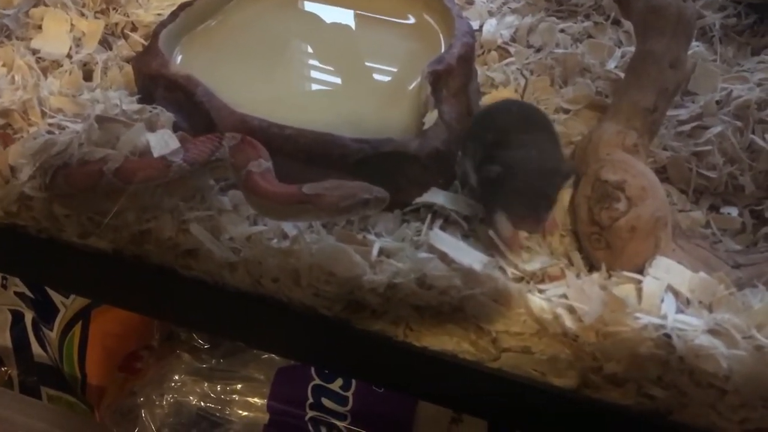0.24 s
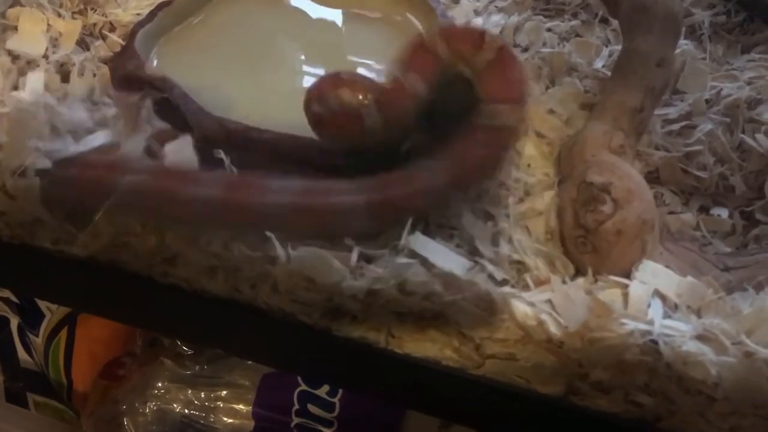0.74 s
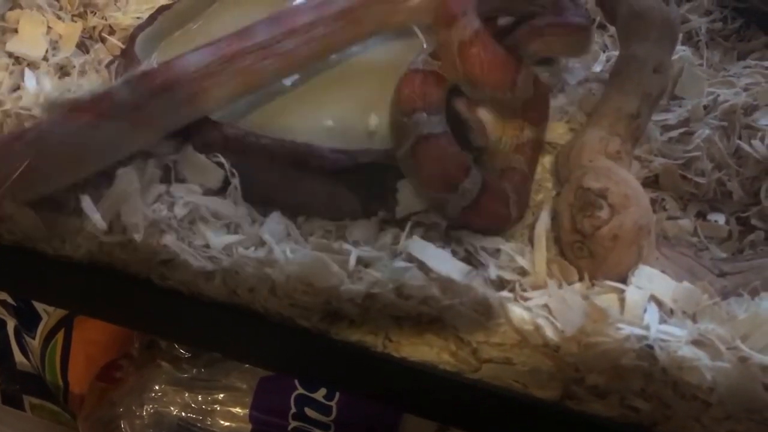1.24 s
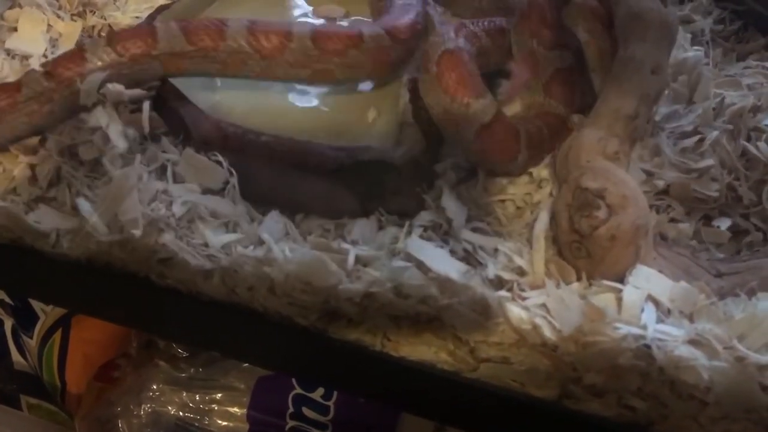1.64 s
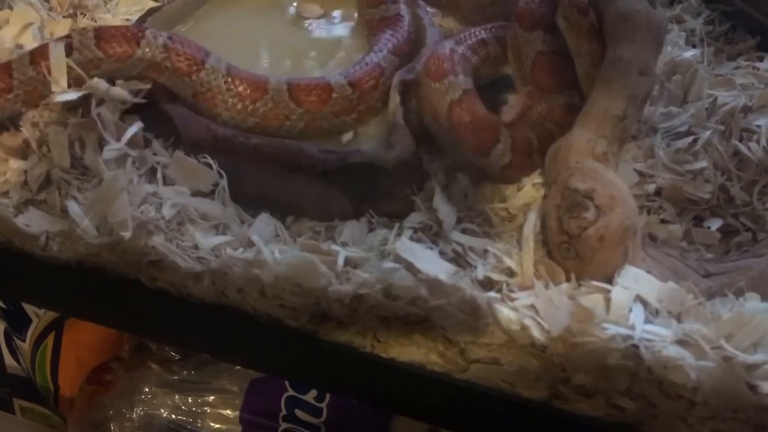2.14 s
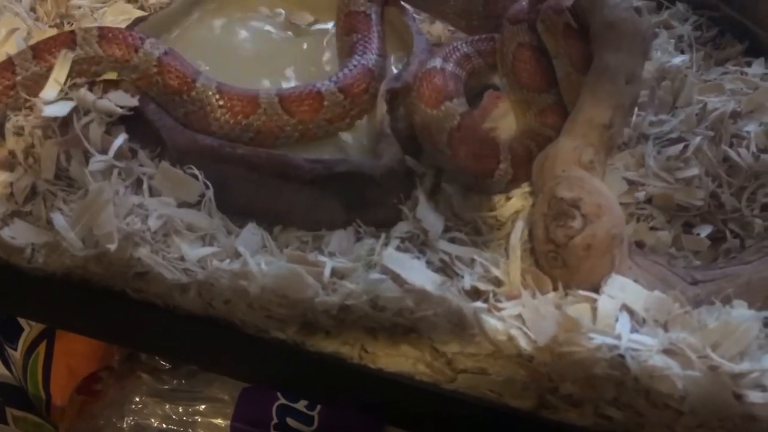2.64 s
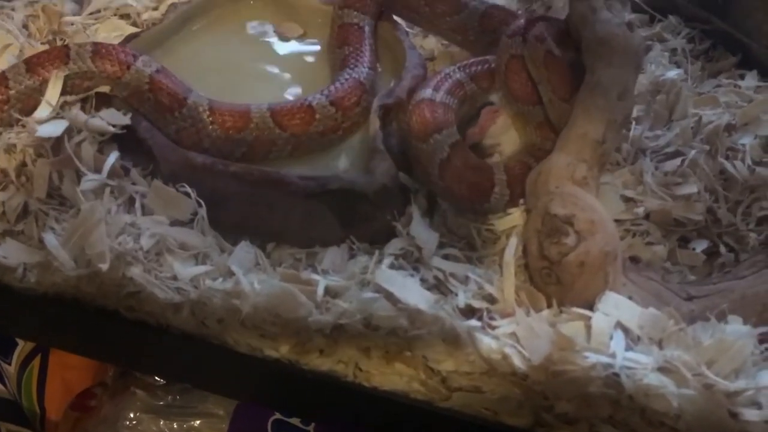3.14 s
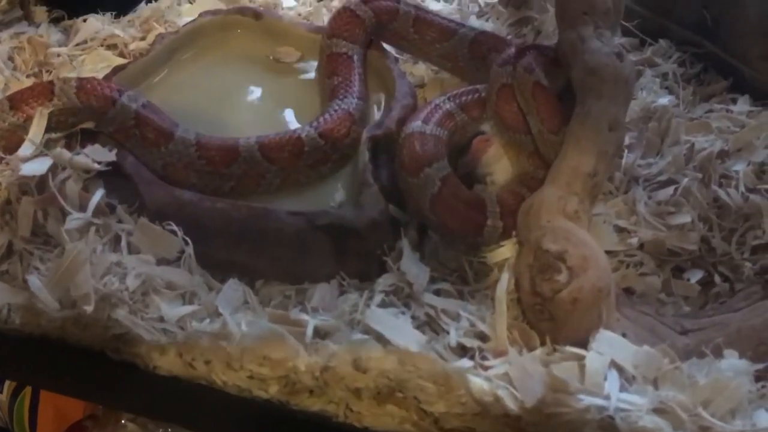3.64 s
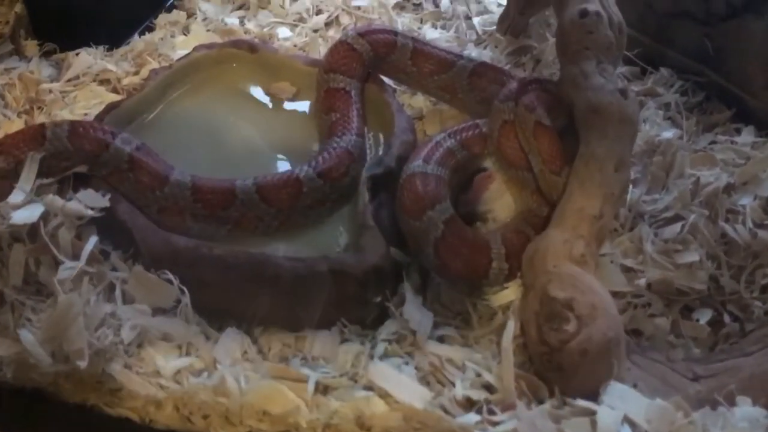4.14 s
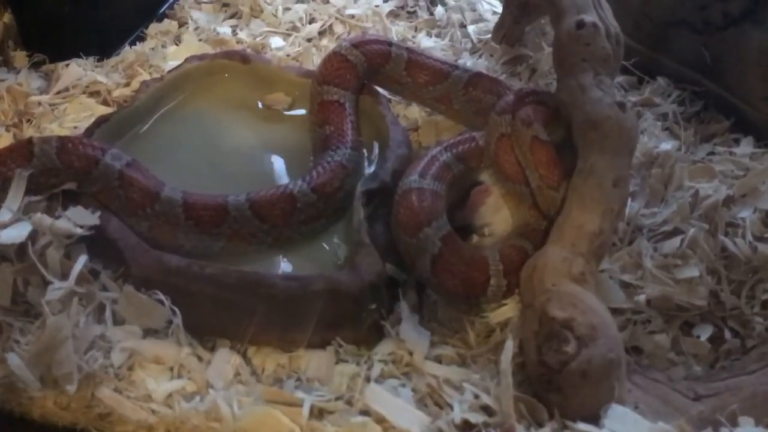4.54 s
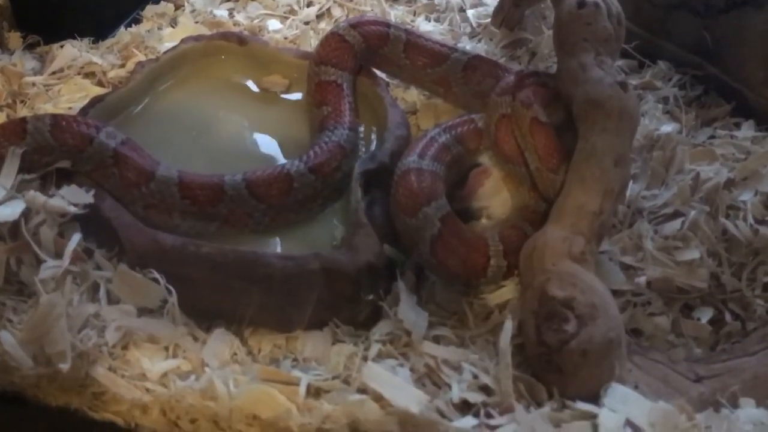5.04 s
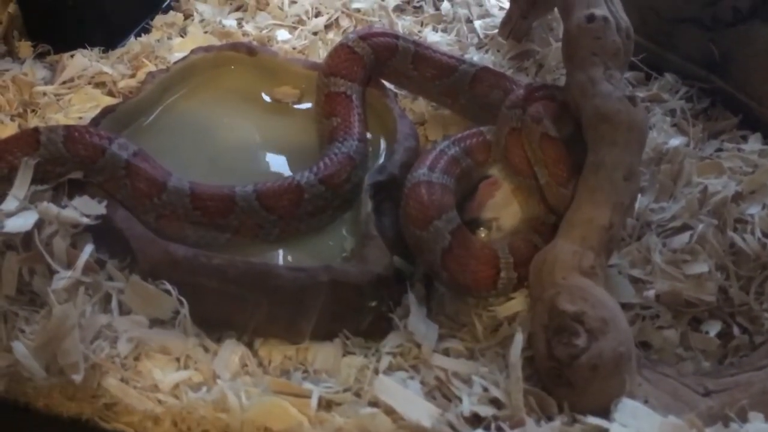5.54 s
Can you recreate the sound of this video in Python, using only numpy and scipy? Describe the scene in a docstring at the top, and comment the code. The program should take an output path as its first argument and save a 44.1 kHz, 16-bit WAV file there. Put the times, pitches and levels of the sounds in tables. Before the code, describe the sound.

In a small glass tank bedded with wood shavings, a snake lunges and strikes with a sharp hollow knock. A mouse squeals in short, raspy high chirps, the last one loudest, then wheezes weakly. Shavings rustle. Afterwards there is only low handling rumble, faint hiss and dull thumps from a close hand-held microphone.

```python
"""A mouse squeals in quick, strained arches as a snake strikes it in a glass tank bedded with wood shavings.
Its stack of harmonics breaks into a second pitch; an undertone and two wheezes trail the last squeal.
The snake's knocks ring damped modes, its moves stir grains of bedding, and decaying noise gives the tank's echo.
A hand-held camera close by adds dispersed handling thumps, filtered-noise rumble, hiss and a soft motor whirr."""
import sys
import numpy as np
from scipy import signal
from scipy.fft import rfft, irfft
from scipy.io import wavfile

SR = 44100
rng = np.random.default_rng(int(sys.argv[2]) if len(sys.argv) > 2 else 0)


def wrap_up_sound(samples):
    """Save the sound to the file named by the first command line argument, as 16-bit audio."""
    columns = np.atleast_2d(samples).T
    # keep every value between -1 and 1, then stretch to whole-number steps
    tamed = np.clip(columns, -1, 1)
    steps = np.round(tamed * 32767).astype(np.int16)
    wavfile.write(sys.argv[1], SR, steps)


N = 255780
TIME = np.arange(N) / SR

# the mouse's throat: (f/Hz, relative level/dB)
THROAT = [(1100, -24), (1700, -15), (2300, 4), (3100, -1.5), (3900, -9.5), (4900, 0), (5700, 1), (6600, 0),
          (7400, 2), (8400, -10.5), (11500, -9), (15500, -18.5)]
# the colour of crunching, stirred shavings: (f/Hz, relative level/dB)
SHAVINGS = [(200, 6), (400, 6), (800, -1.5), (1300, -2.5), (2400, -7.5), (4000, -16.5), (8000, -19),
            (15000, -46)]


def undb(db):
    """Decibels to gain."""
    return 10 ** (np.asarray(db) / 20)


def unit(x):
    """Scale to rms 1."""
    return x / np.sqrt(np.mean(x ** 2))


def shape_db(points, hz):
    """Read a spectrum on a log-frequency axis."""
    f, db = np.transpose(points)
    return np.interp(np.log(np.maximum(hz, 1)), np.log(f), db)


def colour(x, points):
    """Give a signal a spectrum; rms 1."""
    gain = undb(shape_db(points, np.fft.rfftfreq(N, 1 / SR)))
    return unit(irfft(rfft(x) * gain, N))


def wander(hz):
    """Smooth chance, rolling off around a given rate; rms 1."""
    f = np.fft.rfftfreq(N, 1 / SR)
    return unit(irfft(rfft(rng.standard_normal(N)) / (1 + (f / hz) ** 2), N))


def gate(start, end, attack_s, release_s):
    """Attack, hold and release, 0-1."""
    return np.clip(np.minimum((TIME - start) / attack_s, (end - TIME) / release_s), 0, 1)


def add(out, s, sound, peak_db):
    """Place a sound at a time, with a given peak."""
    i = max(int(s * SR), 0)
    out[i:i + len(sound)] += (undb(peak_db) * sound / np.abs(sound).max())[:N - i]


def mouse(jitter=0.0533, jitter_hz=420, waver=0.0269, waver_hz=127, quiver=0.049, quiver_hz=45,
          shimmer_db=0.5, rasp_hz=380, air_db=-19, arch=1.8, flicker_db=2.0,
          mouth_db=7.5, mouth_width_hz=590, attack_s=0.016, release_s=0.015):
    """Strained vocal folds: a quivering, rasping stack of harmonics, joined by a second pitch where it breaks."""
    # squeals, some in two or three quick efforts; pitch climbs with the strain to a crest, then sinks:
    # (start t/s, crest t/s, end t/s, top pitch f/Hz, pitch sag at the ends/0-1, level/dB,
    #  swell toward the crest/dB, brightness/dB per octave, roughness/0-1, mouth resonance f/Hz)
    squeals = [(0.691, 0.714, 0.77, 2182, 0.14, -47, 4, 0.5, 0.4, 5940),
               (0.765, .835, 0.85, 2352, 0.16, -45, 4.5, 2.5, 0.6, 6300),
               (0.849, 0.907, .936, 2319, .08, -35, 12, 2, .55, 6670),
               (1.024, 1.146, 1.247, 2975, .3, -46, 12.5, 3.5, 0.74, 6860),
               (1.196, 1.247, 1.292, 2780, .24, -49.5, 4.5, 3.5, 0.58, 5670),
               (1.407, 1.464, 1.512, 2505, 0.21, -52.5, 10.5, 3.5, .55, 5340),
               (1.612, 1.668, 1.74, 2275, 0.08, -45, 8.5, 4.5, 0.39, 4860),
               (1.691, 1.753, 1.784, 2462, 0.07, -42, -1.5, 0, 0.41, 5000),
               (1.957, 1.994, 2.02, 2120, .05, -47.5, 14, -14.5, 0.4, 4350),
               (1.994, 2.059, 2.153, 2504, 0.23, -32.5, 11.5, -1.5, 0.74, 5166)]
    quiver_rate = quiver_hz * (1 + .25 * wander(20))
    tremor = quiver * np.sin(2 * np.pi * np.cumsum(quiver_rate) / SR)
    shake = tremor + jitter * wander(jitter_hz) + waver * wander(waver_hz)
    rasp = shimmer_db * wander(rasp_hz)
    second, beating = second_pitch()
    air = undb(air_db) * colour(rng.standard_normal(N), THROAT)
    out = np.zeros(N)
    k = np.arange(1, 8)[:, None]  # harmonic numbers
    flicker = flicker_db * np.array([wander(40) for _ in k])  # each harmonic comes and goes
    for start, crest, end, top_hz, sag, db, swell_db, tilt_db, rough, mouth_hz in squeals:
        on = (TIME > start) & (TIME < end)
        slack = np.abs(TIME[on] - crest) / max(crest - start, end - crest)  # 0 at full strain
        hz = top_hz * (1 - sag * slack ** arch) * (1 + rough * shake[on])
        loudness = undb(db - swell_db * slack) * gate(start, end, attack_s, release_s)[on]

        mouth = mouth_db / (1 + ((k * hz - mouth_hz) / mouth_width_hz) ** 2)
        gain_db = shape_db(THROAT, k * hz) + mouth + tilt_db * np.log2(k) + flicker[:, on]
        gain = undb(gain_db) * (k * hz < SR / 2)
        phase = 2j * np.pi * np.cumsum(hz) / SR
        harmonics = gain * np.exp(2j * np.pi * k * np.cumsum(hz) / SR)
        stack = harmonics.sum(0) / np.sqrt((gain ** 2).sum(0))

        # the tiny throat passes the sum tones of the two pitches, mostly those of the fundamental
        sum_tones = beating[on] * np.exp(phase)
        total = np.sqrt(1 + np.abs(second[on]) ** 2 + np.abs(beating[on]) ** 2)
        voice = (stack + second[on] + sum_tones).imag / total
        out[on] += loudness * (unit(voice * undb(rough * rasp[on])) + rough * air[on])
    return out


def second_pitch(jitter=0.055):
    """A second oscillation in each voice break, once at its own level and once at that of its sum tone."""
    # the voice breaks: (start t/s, end t/s, f/Hz, level against the stack/dB, sum tone level/dB)
    breaks = [(0.838, 0.842, 3020, -26, -3), (0.92, 0.928, 3100, -9, -26), (1.153, 1.195, 3400, -8, -7),
              (1.764, 1.779, 3470, -6, -25), (1.963, 2.001, 3090, -8, -20),
              (2.03, 2.098, 3415, -11.5, -5.5), (2.088, 2.15, 3270, -8, 1.5)]
    tone, beating = np.zeros(N, complex), np.zeros(N, complex)
    shake = wander(450)
    for start, end, hz, db, beat_db in breaks:
        on = (TIME > start) & (TIME < end)
        phase = 2j * np.pi * np.cumsum(hz * (1 + jitter * shake[on])) / SR
        wave = np.exp(phase) * signal.windows.tukey(on.sum(), .2)
        tone[on] += undb(db) * wave
        beating[on] += undb(beat_db) * wave
    return tone, beating


def undertone_and_wheezes(jitter=0.116, swell_db=22):
    """A low undertone beneath the last squeal, then two hoarse wheezes: weak tones smeared by an unsteady pitch."""
    # the undertone, then the wheezes:
    # (crest t/s, half length t/s over which the swell falls away, f/Hz, crest level/dB)
    weak_tones = [(2.067, 0.16, 1132, -67), (2.155, 0.048, 1286, -54.5), (2.272, 0.1, 1293, -61.5)]
    out = np.zeros(N)
    unsteady = 1 + jitter * wander(250.0)
    for crest, half_s, hz, db in weak_tones:
        swell = undb(db - swell_db * ((TIME - crest) / half_s) ** 2)
        out += swell * unit(np.sin(2 * np.pi * np.cumsum(hz * unsteady) / SR))
    return out


def knocks(crack_s=0.013, push_s=0.0019, count=3, bounce_s=.0082, bounce_loss_db=9):
    """The snake's blows bounce, ring damped modes of the tank and furnishings, and crunch a few shavings."""
    # blows: (t/s, first peak level/dB, crunch of shavings against the ring/dB)
    blows = [(0.8585, -13, -22.5), (.897, -26.5, -29), (0.975, -36.5, -18), (1.320, -37.5, 19)]
    # what they ring with: (f/Hz, level before the push shapes it/dB, t60 t/s)
    tank_modes = [(160.1, -6, 0.58), (244.6, -2.5, 0.12), (342, 1, 0.084), (384, 7.5, 0.054),
                  (472, -11.5, 0.076), (578, -6.5, 0.065), (633, -5.5, 0.14), (670, -12, 0.063),
                  (1357, -1, 0.045)]
    out, t = np.zeros(N), TIME[:SR // 4]
    ring = np.zeros(len(t))
    for hz, db, t60 in tank_modes:
        ring += undb(db) * np.sin(2 * np.pi * hz * t) * undb(-60 * t / t60)
    push = np.sin(np.pi * np.minimum(t / push_s, 1)) ** 2  # a soft body presses and lets go
    ring = np.gradient(signal.fftconvolve(ring, push)[:len(t)])  # the panes radiate their acceleration
    ring = ring / np.abs(ring).max()
    for s, db, crunch_db in blows:
        for bounce in range(count):
            crack = unit(colour(rng.standard_normal(N), SHAVINGS)[:len(t)]) * np.exp(-t / crack_s)
            blow = ring + undb(crunch_db) * crack
            add(out, s + bounce * bounce_s, blow, db - bounce * bounce_loss_db)
    return out


def bedding(grains_per_s=2500, spread_db=3.5, rise_s=0.027):
    """Dense tiny snaps of wood shavings flare up with each move of the snake and die away."""
    # moves through the shavings: (push t/s, level/dB, dying away/dB per s)
    moves = [(.58, -54, 21), (.86, -59.5, 12), (1.33, -59.5, 24), (2.15, -49.5, 145), (2.41, -63.5, 53)]
    struck = rng.random(N) < grains_per_s / SR
    strength_db = spread_db * np.minimum(rng.exponential(size=N), 4)
    grains = struck * rng.standard_normal(N) * undb(strength_db)
    power = np.zeros(N)
    for s, db, fade_db in moves:
        rise = np.exp(np.minimum(TIME - s, 0) / rise_s)
        power += (undb(db - fade_db * np.maximum(TIME - s, 0)) * rise) ** 2
    return colour(grains, SHAVINGS) * np.sqrt(power)


def tank(x, early_db=4, early_t60=0.038, late_db=-4, late_t60=0.25):
    """Reflections between the panes as decaying noise: a strong quick burst and a weaker lingering ring."""
    t = TIME[:SR // 2]
    response = np.zeros(len(t))
    for db, t60 in ((early_db, early_t60), (late_db, late_t60)):
        tail = rng.standard_normal(len(t)) * np.exp(-np.log(1000) * t / t60) * (t > .001)
        response += undb(db) * tail / np.linalg.norm(tail)
    response[0] = 1  # the direct sound
    return signal.fftconvolve(x, response / np.linalg.norm(response))[:N]


def thumps(lag_cycles=0.38, size=8192):
    """Taps travel through the casing as bending waves: the lows come late, so each thump falls in pitch."""
    # taps on the camera: (t/s, peak level/dB, brightness/dB per octave, hard tick of the contact/dB)
    taps = [(0.161, -35, -3.5, -8), (0.254, -36, 2, -12), (0.602, -25.5, -6, -8), (0.69, -6.5, 2, -8.5),
            (0.825, -33.5, -3, -1), (1.175, -32.5, -4, -3), (1.514, -30.5, -2, -15), (1.868, -28.5, 5, -16),
            (2.163, -27, 2, -7), (2.578, -29, 2, -1), (2.73, -28, -1, -16), (3.254, -23, -4.5, 6),
            (3.261, -10.5, -2.5, 8), (3.903, -33, -4.5, -14), (4.107, -33.5, 0, -12),
            (4.768, -22.5, 0, -14), (4.847, -28, 3.5, -4), (5.219, -26.5, 1, 2.5), (5.321, -23.5, 2, 5),
            (5.687, -2, 0, 3.5), (5.7093, -15.5, 1.5, -4)]
    # what the casing passes on: (f/Hz, relative level/dB)
    casing = [(25, -40.5), (50, -3), (85, 8), (130, 5.5), (230, -1), (370, -9.5), (470, -25.5), (620, -24),
              (800, -47.5), (1500, -46), (2200, -55), (3200, -72), (6000, -81)]
    out = np.zeros(N)
    hz = np.maximum(np.fft.rfftfreq(size, 1 / SR), 1)
    lead = int(.003 * SR)  # samples of soft start
    fade_in = np.sin(np.pi / 2 * np.minimum(np.arange(size // 2) / lead, 1)) ** 2
    dispersion = np.exp(-2j * np.pi * lag_cycles * np.log(hz / 150))
    for s, db, tilt_db, tick_db in taps:
        tilt = tilt_db * np.log2(np.clip(hz, 100, 700))
        tick = shape_db([(520, 0.0032), (1000, tick_db)], hz)
        spectrum_db = shape_db(casing, hz) + tilt + tick
        # keeping half the cepstrum makes the response start at once (minimum phase)
        cepstrum = irfft(np.log(undb(spectrum_db)))
        causal = np.exp(rfft(2 * cepstrum[:size // 2], size))
        wave = np.roll(irfft(causal * dispersion), lead)[:size // 2]
        add(out, s - lead / SR, wave * fade_in, db)
    return out


def handling(lift_db=2.2, uneven_db=2.02):
    """Fingers creep on the casing in an uneven low rumble."""
    # how firmly the hand grips: (t/s, rumble level before the lift/dB)
    grip = [(0.0, -46), (0.69, -44.5), (0.89, -51), (1.28, -46.5), (1.47, -45.5), (1.61, -48), (1.87, -50),
            (2.05, -47.5), (2.96, -49), (3.15, -45.5), (3.34, -54.5), (3.55, -50.5), (3.73, -45),
            (4.43, -48.5), (4.6, -47.5), (5.48, -48), (5.8, -49.5)]
    # the rumble's colour: (f/Hz, relative level/dB)
    rumble = [(13, -52), (22, -31.5), (54, 2.5), (102, 0), (166, -4), (237, -12), (272, -13), (360, -21.5),
              (427, -33), (484, -30.5), (900, -75), (1170, -96), (1980, -120)]
    grip_db = np.interp(TIME, *np.transpose(grip))
    return colour(rng.standard_normal(N), rumble) * undb(grip_db + lift_db + uneven_db * wander(29))


def background(hiss_db=-68, flicker_db=2.0, motor_ramp_s=0.031):
    """Faint flickering hiss and the lens motor's uneven whirr, both noise with a slight 60 Hz buzz."""
    # the hiss's colour: (f/Hz, relative level/dB)
    hiss_colour = [(350, -23), (600, -5), (706, -5), (855, -8), (1530, -8), (1710, 0), (2750, -14.5),
                   (3200, -12.5), (4880, -14.5), (5360, -9), (7330, -13), (7960, -12), (8990, -15.5),
                   (9890, -14), (15500, -24.5)]
    # runs of the lens motor: (start t/s, end t/s, level/dB)
    motor_runs = [(3.954, 4.32, -65.5), (4.489, 4.686, -66)]
    # the motor's colour: (f/Hz, relative level/dB)
    whirr_colour = [(900, -2), (2000, 14.5), (3200, -12), (4300, 6), (5600, 10), (7400, 1), (8000, 11),
                    (8800, -2), (9600, 7), (12000, 0), (15000, -10)]
    pulse = unit(1 + .3 * signal.sawtooth(2 * np.pi * 60 * TIME))
    hiss = colour(rng.standard_normal(N), hiss_colour) * undb(hiss_db + flicker_db * wander(55))
    running = np.zeros(N)
    for start, end, db in motor_runs:
        running += undb(db) * gate(start, end, motor_ramp_s, motor_ramp_s)
    whirr = colour(rng.standard_normal(N), whirr_colour) * running * undb(1.8 * wander(59))
    return (hiss + whirr) * pulse


def scene():
    """Voice and bedding echo in the tank; the knocks and the camera's own sounds stay dry."""
    in_tank = tank(mouse() + undertone_and_wheezes() + bedding())
    on_camera = thumps() + handling() + background()
    return (in_tank + knocks() + on_camera)[None]


def record(dry, top_hz=15750):
    """A steep elliptic low-pass cuts the top."""
    low_pass = signal.ellip(10, .2, 80, top_hz, fs=SR, output="sos")
    return signal.sosfilt(low_pass, dry)


dry = scene()
out = record(dry)
wrap_up_sound(out)
```